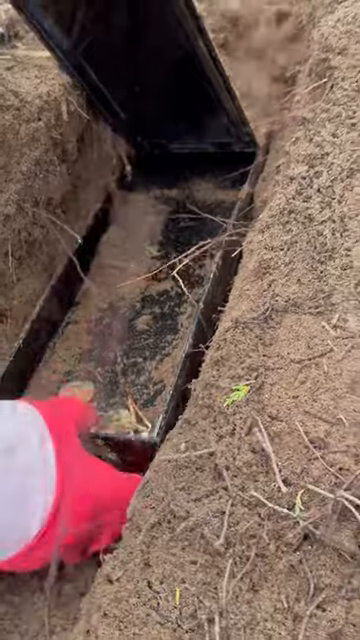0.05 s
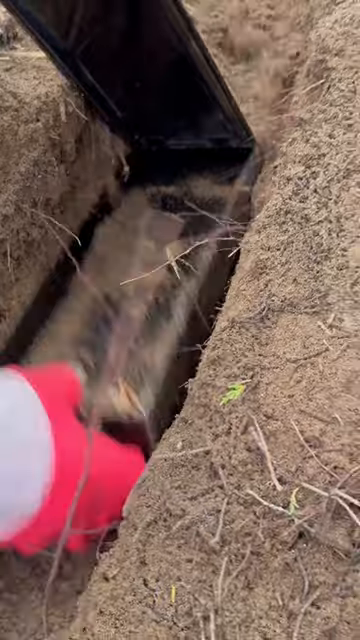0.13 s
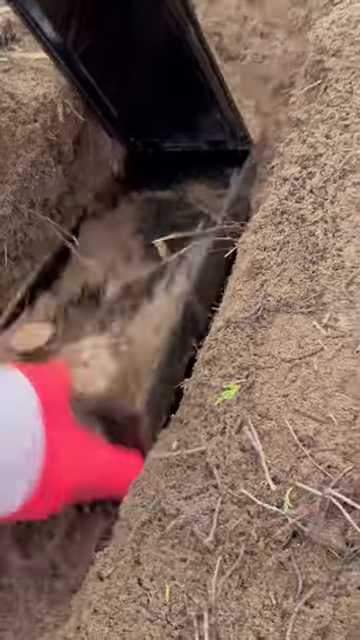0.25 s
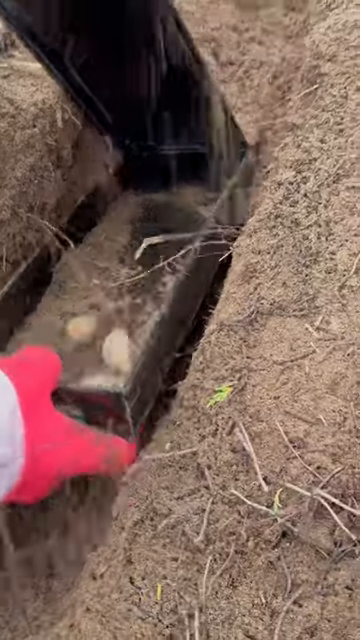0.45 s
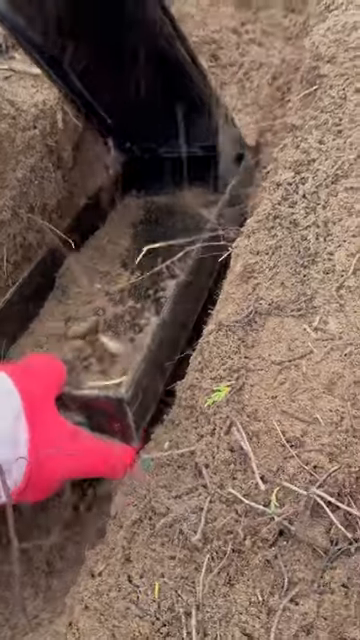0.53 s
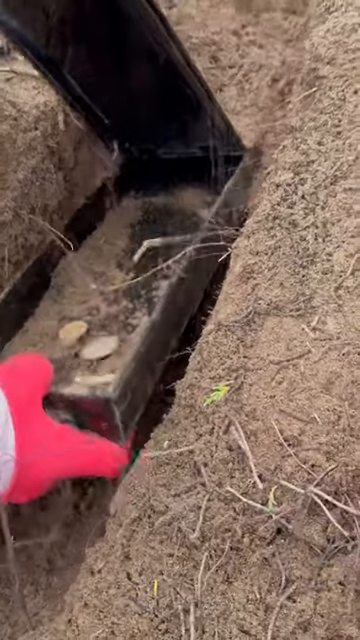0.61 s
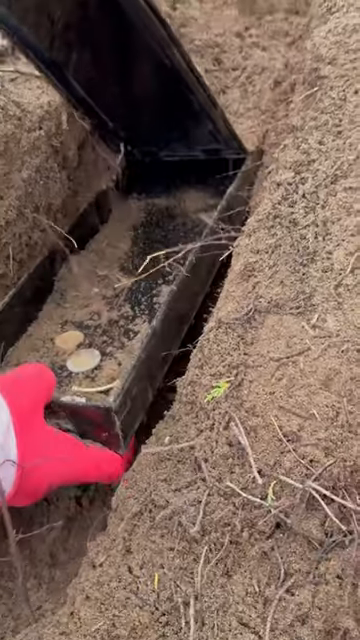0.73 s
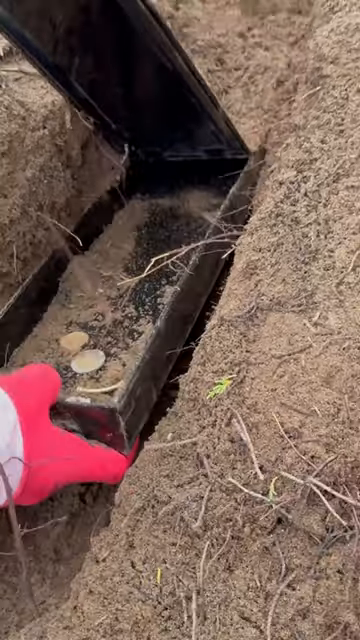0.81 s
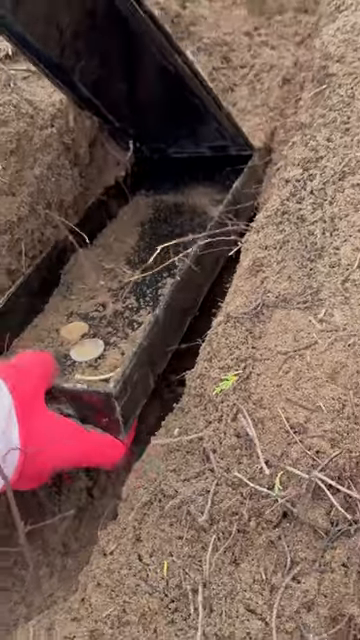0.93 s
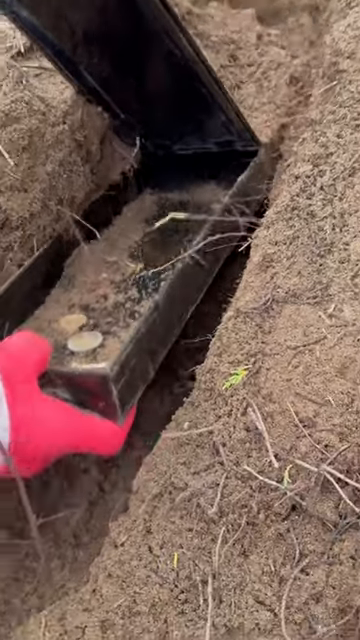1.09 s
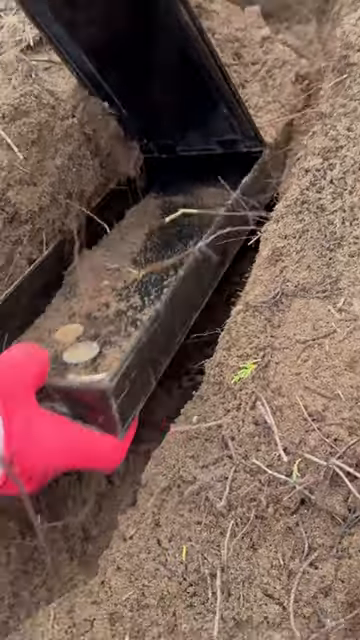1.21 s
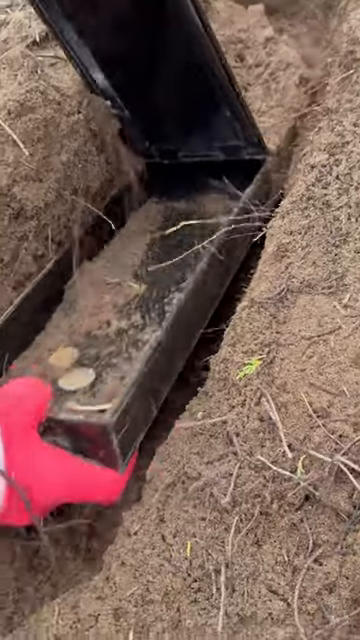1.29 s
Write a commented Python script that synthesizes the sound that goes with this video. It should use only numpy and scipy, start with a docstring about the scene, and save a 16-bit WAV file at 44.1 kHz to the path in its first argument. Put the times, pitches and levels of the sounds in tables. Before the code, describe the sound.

Coins and dirt clatter inside a steel box, close by, from about 0.2 seconds. The rattle peaks near 0.3 seconds with one dull knock and brief coin ringing, then thins into smaller showers until 0.7. A few crumbs tick around 0.8. From 1.0 to 1.3 seconds the box scrapes softly against earth, with trickling sand and faint coin clinks. Light outdoor wind rumbles underneath throughout.

```python
"""Outdoors at a trench, a steel box holding a few coins and dry soil is jerked up close to the microphone.
Coins and clods clatter over its floor in quick showers, the box knocks once, and the coins ring briefly.
Then the box scrapes along the trench wall while sand trickles; a light wind rumbles underneath."""
import sys
import numpy as np
from scipy import signal
from scipy.fft import rfft, irfft
from scipy.io import wavfile

SR = 44100
rng = np.random.default_rng(int(sys.argv[2]) if len(sys.argv) > 2 else 0)


def persist_wave(psi):
    """Save psi, clipped to +-1, as 16-bit WAV."""
    counts = np.round(np.clip(psi, -1, 1) * 32767).astype(np.int16)
    wavfile.write(sys.argv[1], SR, np.atleast_2d(counts).T)


N = 59535
T = np.arange(N) / SR
HZ = np.fft.rfftfreq(4096, 1 / SR)  # the frequencies at which tone curves are drawn

# Showers of coins and clods on the box floor. Each row: start, rise, hold and fade time in seconds,
# level in dB, treble boost in dB, pitch of the struck spot in Hz, its boost in dB, thump level in dB.
SHOWERS = [ (0.182, .005, .022, .06, -35, 1, 1700, 2, -50), (0.208, .002, .010, .06, -22, 12, 1200, 3, -48),
           (0.217, .002, .011, .12, -16.5, 12, 1350, 7.5, -45),
           (0.246, .001, .006, .12, -14.5, 2, 2600, 8, -27), (0.281, .004, .011, .08, -10, 2, 1750, 5, -24),
           (0.309, .003, .007, .10, -23, 0, 1300, 1, -24), (0.363, .002, .007, .07, -27.5, 4, 1500, 7, -42),
           (0.394, .008, .019, .06, -33, 1, 1900, 3, -46), (0.414, .005, .010, .07, -21, 1, 3800, 4, -38),
           (0.429, .003, .008, .05, -17.5, 0, 6800, 3, -28),
           (0.491, .002, .008, .07, -37, -6, 1000, 7, -48), (0.508, .002, .013, .06, -36, 1, 2700, 3, -50),
           (0.521, .001, .007, .06, -28.5, -3, 950, 7, -33), (0.537, .003, .016, .08, -39, -2, 850, 5, -36),
           (0.570, .001, .008, .04, -22, -3, 1700, 2, -27), (0.630, .009, .014, .06, -34, -4, 950, 8, -43),
           (0.656, .003, .008, .05, -41, -9, 800, 6, -37)]


def amp(db):
    """Turns decibels into a gain."""
    return 10 ** (np.asarray(db) / 20)


def unit(x):
    """Scales a signal to an average (rms) level of 1."""
    return x / np.sqrt(np.mean(x ** 2) + 1e-20)


def match_level(x, envelope):
    """Gives a signal the same average level as an envelope (a loudness outline)."""
    return unit(x) * np.sqrt(np.mean(envelope ** 2))


def curve(points):
    """Joins rows of frequency in Hz and level in dB into a tone curve."""
    hz, db = np.transpose(points)
    return np.interp(np.log(HZ + 1), np.log(hz + 1), db)


def treble(db):
    """A tone curve for the treble that fine grit and coin edges add above about 6000 Hz."""
    return db / (1 + (6000 / (HZ + 1)) ** 4)


def colour(x, db):
    """Filters a sound by the shape of a tone curve; the curve's overall height does not matter."""
    log_gain = np.log(amp(np.maximum(db - db.max(), -100)))
    mirrored = np.concatenate([log_gain, log_gain[-2:0:-1]])
    response = np.exp(np.conj(signal.hilbert(mirrored)))  # rings after a hit, never before it
    taps = np.fft.ifft(response).real[:len(HZ)]
    return signal.fftconvolve(x, taps / np.linalg.norm(taps))[:N]


def fade(t, t60):
    """Dies away from t = 0, dropping 60 dB in the fade time of t60 seconds."""
    return np.exp(-np.log(1000) * np.maximum(t, 0) / t60)


def swell(at, rise, t60):
    """Grows smoothly to a peak, then fades."""
    return np.exp(-(np.minimum(T - at, 0) / rise) ** 2) * fade(T - at, t60)


def burst(at, rise, hold, t60):
    """Ramps up, and begins to fade `hold` seconds after its start."""
    return np.clip((T - at) / rise, 0, 1) * fade(T - at - hold, t60)


def impacts(envelope, per_s, spread_db):
    """Tiny random hits of uneven size whose loudness follows an envelope."""
    size = amp(spread_db * np.minimum(rng.exponential(1, N), 3))
    sign = rng.choice([-1, 1], N)
    hits = rng.random(N) < per_s / SR
    return match_level(size * sign * hits * envelope, envelope)


def wind():
    """A low rumble, nearly the same in both ears, with faint, wider outdoor air."""
    # The wind's tone. Each row: frequency in Hz, level in dB.
    tone = [(20, -28), (35, -12), (55, 0), (110, 0), (190, -6), (280, -16), (500, -23), (850, -24),
            (1300, -27.5), (2200, -39), (5000, -49), (8000, -49), (12000, -54), (16000, -58)]
    # The tone change for the part that differs between the ears. Each row: frequency in Hz, boost in dB.
    width = [(60, -24), (110, -20), (200, -14), (380, -6), (700, -6), (1290, -7), (2380, -17), (4400, -19),
             (8120, -6), (15000, 0)]
    middle = unit(colour(rng.standard_normal(N), curve(tone)))
    side = unit(colour(rng.standard_normal(N), curve(tone) + curve(width)))
    return amp(-40.3) * (middle + amp(-16) * np.array([side, -side]))


def trench_echoes(x):
    """Short scattered echoes from the lid and earth walls, different on each side."""
    # The tone of the echoes. Each row: frequency in Hz, level in dB.
    tone = [(100, -4), (380, 7), (700, 1), (2500, -2), (7000, -2), (10000, 2)]
    reflected = colour(x, curve(tone))
    t = T[:SR // 5]
    tails = rng.standard_normal((2, len(t))) * fade(t, t60=.04) * (t > .001)
    return np.array([signal.fftconvolve(reflected, tail / np.linalg.norm(tail))[:N] for tail in tails])


def sand():
    """A thin trickle of grains slides over the steel, and a few crumbs of grit drop."""
    # The strength of the trickle. Each row: time in seconds, level in dB.
    flow = [(0, -67), (.075, -63), (.125, -47.5), (.175, -47), (.3, -44), (.47, -50), (.6, -53), (.69, -67),
            (.78, -70), (.88, -64), (.97, -53.5), (1.07, -55), (1.13, -52), (1.2, -47.5), (1.35, -51)]
    # The trickle's tone. Each row: frequency in Hz, level in dB.
    tone = [(200, -8), (800, 2), (2500, 0), (5000, -3), (7200, 2), (9000, -5), (14500, -5), (16000, -10)]
    # Single falling crumbs. Each row: start in seconds, level in dB, pitch in Hz.
    crumbs = [(0.801, -47, 3500), (0.815, -50, 8500), (0.838, -52, 8000), (0.846, -46, 7500)]
    trickle = amp(np.interp(T, *np.transpose(flow)))
    out = colour(impacts(trickle, per_s=9000, spread_db=3.5), curve(tone))
    for at, db, hz in crumbs:
        tick = impacts((T >= at) * fade(T - at, t60=.025), per_s=6000, spread_db=4)
        octaves_away = abs(np.log2((HZ + 1) / hz))
        out += amp(db) * colour(tick, -7 * octaves_away)
    return out


def scrapes():
    """The steel drags over the trench wall in many tiny slips."""
    # Rubs on the wall. Each row: peak, rise and fade time in seconds, level in dB, treble boost in dB.
    rubs = [(0.089, .004, .05, -41, -4), (1.035, .006, .07, -35, -2), (1.146, .006, .12, -39, 0),
            (1.160, .006, .07, -41, 2), (1.238, .004, .10, -43, -4), (1.268, .008, .10, -37, 4),
            (1.283, .008, .07, -40, -3), (1.308, .003, .06, -44, -7)]
    # The tone of steel on soil. Each row: frequency in Hz, level in dB.
    tone = [(80, -25), (300, -5), (500, -5), (850, 1), (1800, -3), (3000, -6), (4000, -12), (7500, -11),
            (10000, -15), (13500, -12), (16000, -19)]
    out = np.zeros(N)
    for at, rise, t60, db, treble_db in rubs:
        slips = impacts(swell(at, rise, t60), per_s=9000, spread_db=3)
        out += amp(db) * colour(slips, curve(tone) + treble(treble_db))
    return out


def coins():
    """A struck coin rings with a few high tones and is soon damped by the soil."""
    # Ringing tones, one list for each kind of coin contact. Each pair: pitch in Hz, relative level in dB.
    contacts = [
        [(4468, -41), (5986, -29), (7284, -36), (10750, -41), (11838, -45), (14809, -38)],
        [(6616, 0), (11070, -17), (15050, -20)],
        [(8129, 0), (10210, -5), (14150, -10)],
        [(7930, -53), (8247, -54), (13501, -52), (13991, -57)],
        [(6492, -57), (8672, -57), (10266, -47), (13485, -52)],
    ]
    # Coins ringing. Each row: start in seconds, kind of contact, rise and fade time in seconds, level in dB.
    rings = [(0.219, 0, .008, .16, -21), (0.301, 1, .008, .06, -17.5), (0.332, 2, .006, .16, -38.5),
             (0.474, 2, .006, .2, -51), (0.535, 2, .002, .12, -46), (1.152, 3, .005, .06, -42),
             (1.265, 4, .005, .09, -41)]
    out = np.zeros(N)
    for at, kind, rise, t60, db in rings:
        tones = sum(amp(tone_db) * np.sin(2 * np.pi * (hz * T + rng.random()))
                    for hz, tone_db in contacts[kind])
        out += amp(db) * unit(tones) * burst(at, rise, hold=rise, t60=t60)
    return out


def knock():
    """The box strikes packed earth with one dull blow."""
    # The blow. In order: peak, rise and fade time in seconds, level in dB.
    blow = (0.272, .006, .06, -14)
    # Its dull tone. Each row: frequency in Hz, level in dB.
    tone = [(60, -30), (130, -16), (200, -4), (330, 0), (470, 0), (650, -12), (1500, -30), (5000, -60)]
    at, rise, t60, db = blow
    envelope = swell(at, rise, t60)
    thud = colour(impacts(envelope, per_s=3000, spread_db=1.5), curve(tone))
    return amp(db) * match_level(thud, envelope)


def thumps():
    """The weight of each shower bends the box floor, which booms a little longer than the hits."""
    # The tone of the bending floor. Each row: frequency in Hz, level in dB.
    tone = [(50, -25), (120, -6), (190, 2), (260, -4), (400, -1), (550, -9), (900, -24), (3000, -55)]
    out = np.zeros(N)
    for at, _, hold, *_, db in SHOWERS:
        envelope = burst(at, rise=.004, hold=hold, t60=.13)
        boom = colour(envelope * rng.standard_normal(N), curve(tone))
        out += amp(db) * match_level(boom, envelope)
    return out


def clatter():
    """Coins and clods land in showers of hard little hits, each coloured by the spot it strikes."""
    # The tone all showers share. Each row: frequency in Hz, level in dB.
    tone = [(40, -42), (100, -25), (200, -14), (450, -10), (900, -8), (1600, -8), (2700, -10.5),
            (3800, -15), (6500, -15), (8500, -20), (11000, -17.5), (13000, -19), (14500, -16), (16000, -25)]
    out = np.zeros(N)
    for at, rise, hold, t60, db, treble_db, spot_hz, spot_db, _ in SHOWERS:
        hits = impacts(burst(at, rise, hold, t60), per_s=8000, spread_db=3.6)
        octaves_away = np.log2((HZ + 1) / spot_hz)
        spot = spot_db * np.exp(-(octaves_away / .5) ** 2)
        out += amp(db) * colour(hits, curve(tone) + treble(treble_db) + spot)
    return out


def steel_box(x):
    """The sheet steel passes each hit on and rings at its own pitches."""
    # The ringing tones of the steel. Each row: pitch in Hz, relative level in dB.
    tones = [(188.4, -40), (457.6, -37), (689.1, -44), (759.0, -45), (1195, -46), (1357, -44), (1394, -44),
             (1755, -42), (1986, -46), (2143, -48), (2460, -48), (2762, -50), (3009, -51), (3165, -53)]
    decay = fade(1 / SR, t60=.08)  # share of the ringing left after one sample
    ringing = np.zeros(N)
    for hz, db in tones:
        feedback = decay * np.exp(2j * np.pi * hz / SR)
        ringing += amp(db) * 2 * signal.lfilter([1 - decay], [1, -feedback], x).real
    return x + amp(40.5) * ringing


def scene():
    """The box and its load echo in the trench, a little to the left, over the wind."""
    # The lean to one side. Each row: frequency in Hz, left level minus right level in dB.
    balance = [(60, -0.5), (110, 0.0), (200, -1.0), (380, 3.5), (700, 1.5), (1290, 1.5), (2380, 0.0),
               (4400, 0.0), (8120, 0.0), (15000, 0.0)]
    near = steel_box(clatter() + knock() + scrapes()) + thumps() + coins() + sand()
    heard = near + amp(-12.5) * trench_echoes(near)
    lean_db = np.interp(np.fft.rfftfreq(2 * N, 1 / SR), HZ, curve(balance))
    side_gains = amp(np.array([lean_db, -lean_db]) / 2)
    return irfft(rfft(heard, 2 * N) * side_gains)[:, :N] + wind()


def record(dry):
    """The microphone's two openings hear the top octave out of step; peaks and top treble are trimmed."""
    from_hz, to_hz, lag_s = 8500, 9500, .000325
    ceiling, cutoff_hz = .92, 16100
    hz = np.fft.rfftfreq(2 * N, 1 / SR)
    flip = np.pi * np.clip((hz - from_hz) / (to_hz - from_hz), 0, 1)  # the left wave turns upside down
    delay = 2 * np.pi * lag_s * np.maximum(hz - to_hz, 0)  # and above that it arrives late
    shifts = np.array([np.exp(-1j * (flip + delay)), np.ones(len(hz))])
    stereo = irfft(rfft(dry, 2 * N) * shifts)[:, :N]
    rounded = stereo / (1 + (stereo / ceiling) ** 4) ** (1 / 4)
    lowpass = signal.firwin(511, cutoff_hz, window=("kaiser", 9), fs=SR)
    return signal.oaconvolve(rounded, lowpass[None], "same")


dry = scene()
out = record(dry)
persist_wave(out)
```